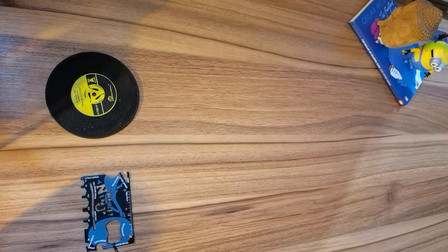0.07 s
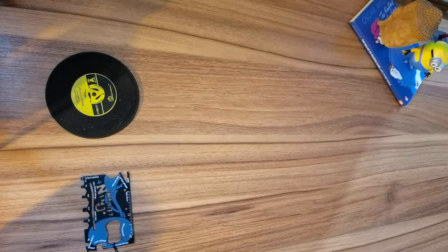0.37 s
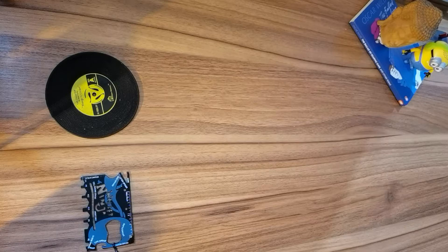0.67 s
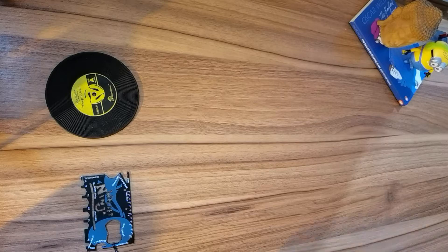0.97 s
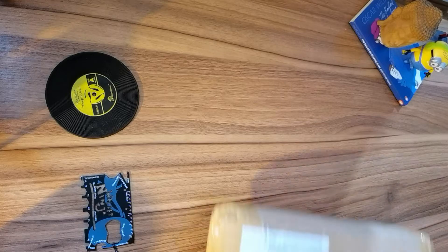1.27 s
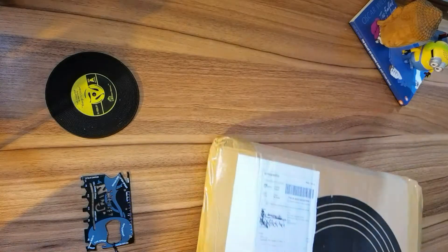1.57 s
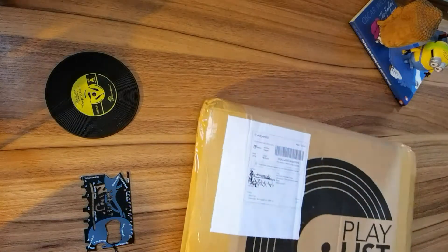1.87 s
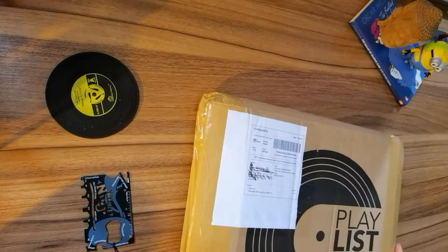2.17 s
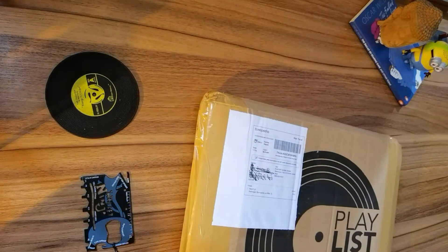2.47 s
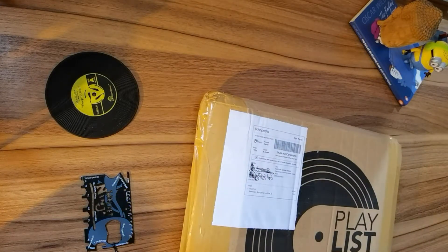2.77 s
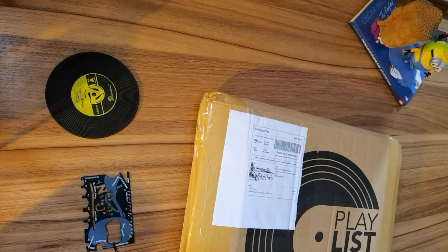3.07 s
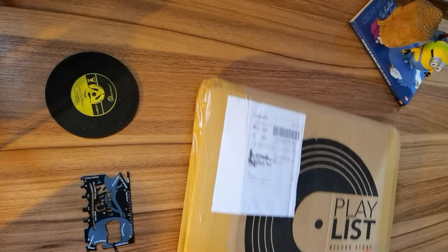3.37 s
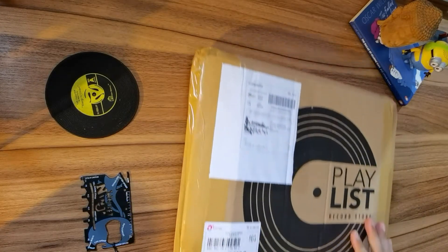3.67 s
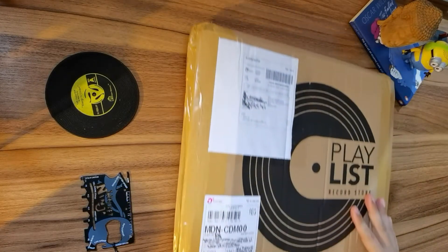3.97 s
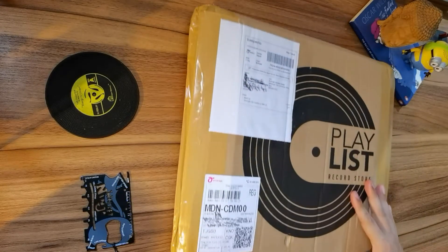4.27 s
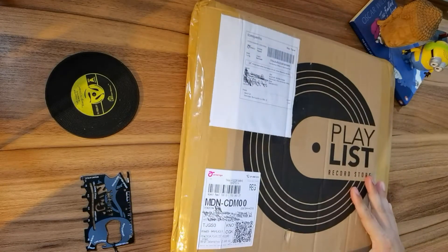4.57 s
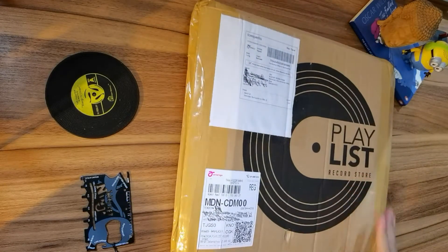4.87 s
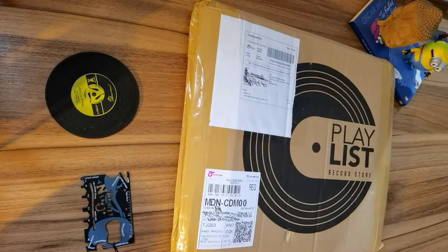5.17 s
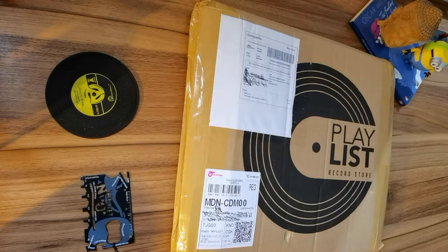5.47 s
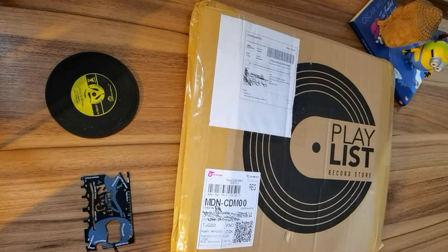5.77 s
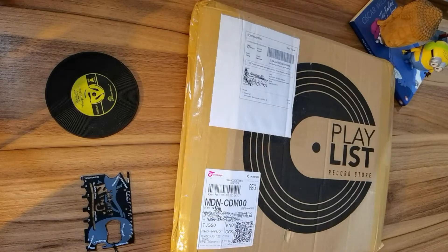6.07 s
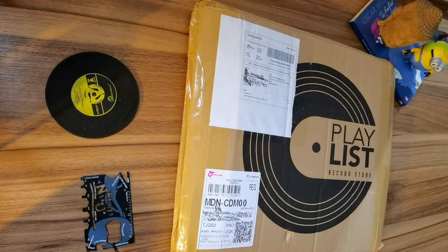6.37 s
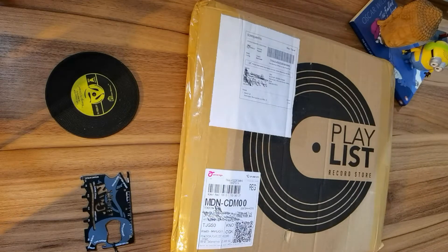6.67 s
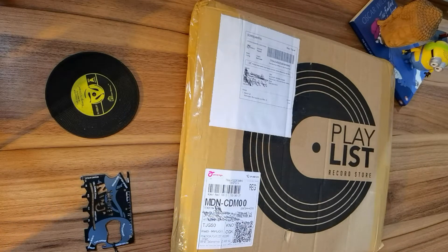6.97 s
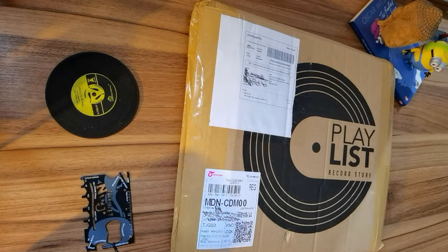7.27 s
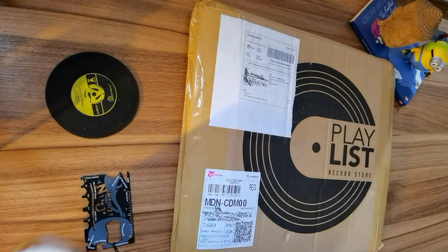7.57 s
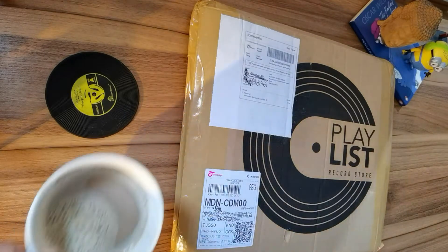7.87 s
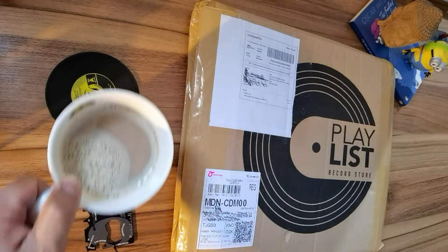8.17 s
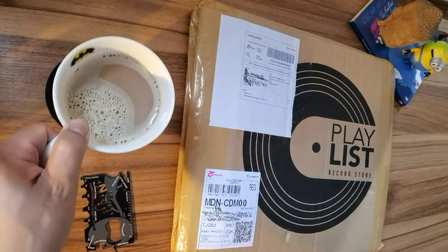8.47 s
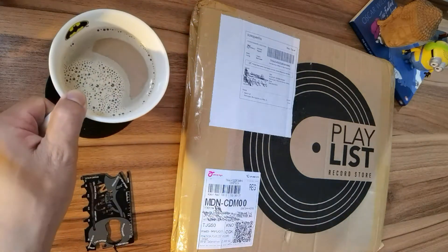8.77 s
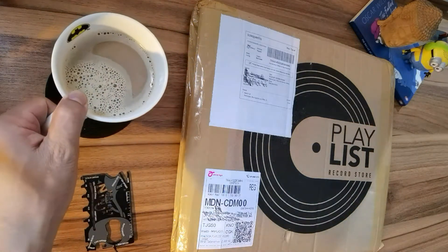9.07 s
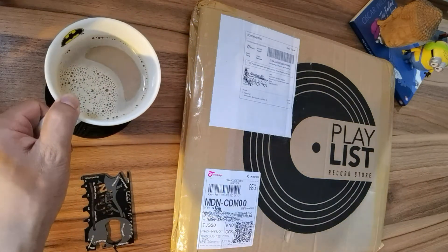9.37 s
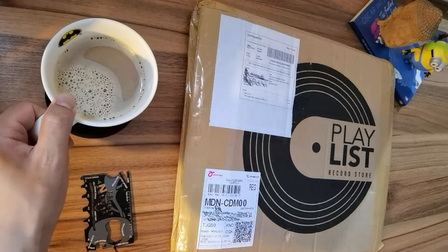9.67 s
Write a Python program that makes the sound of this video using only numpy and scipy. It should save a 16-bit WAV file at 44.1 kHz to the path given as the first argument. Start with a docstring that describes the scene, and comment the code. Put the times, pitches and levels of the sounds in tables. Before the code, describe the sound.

Heard close up in stereo, plastic wrap rustles and snaps around a cardboard parcel as it scrapes onto a wooden table and drops flat with hollow knocks and a thump. One long push hisses across the wood and dies away with a few crinkles. Faint room tone and a low wobbling rumble fill the small room, broken by one brief, faint hoot and finally a mug set down with a dull bump.

```python
"""A small, quiet room, a spaced pair of microphones close to a wooden table. A cardboard parcel in
plastic wrap is picked up, pushed over the table edge, dropped flat and slid along. Tiny friction slips
make the wrap hiss and the carton rasp; creases snap, the carton knocks, the table top thumps and rings.
Later comes one brief low hoot, and near the end a mug is set down softly on a coaster.
Under it all lie faint room tone and a low wobble that comes and goes."""
import sys
import numpy as np
from scipy import signal
from scipy.fft import rfft, irfft, next_fast_len
from scipy.io import wavfile
from scipy.ndimage import uniform_filter1d, map_coordinates

SR = 44100
rng = np.random.default_rng(int(sys.argv[2]) if len(sys.argv) > 2 else 0)


def transcribe(signal):
    """Save signal, clipped to [-1, 1], as a 16-bit WAV file at the path in sys.argv[1]."""
    frames = np.atleast_2d(signal).T
    limited = np.clip(frames, -1, 1)
    pcm = np.round(limited * 32767).astype(np.int16)
    wavfile.write(sys.argv[1], SR, pcm)


N = 433503


def amp(db):
    """Decibels to gain."""
    return 10 ** (np.asarray(db) / 20)


def unit(x):
    """Scales to rms 1."""
    return x / np.sqrt(np.mean(x ** 2) + 1e-20)


def read(points, hz):
    """Reads a table on a log-frequency axis."""
    point_hz, value = np.transpose(points)
    return np.interp(np.log(hz + 1), np.log(point_hz + 1), value)


def add(mix, start_s, sound):
    """Mixes a sound into both channels."""
    part = mix[:, max(round(start_s * SR), 0):][:, :sound.shape[-1]]
    part += sound[..., :part.shape[-1]]


def tint(x, gain):
    """Filters by a gain that is a function of frequency."""
    size = next_fast_len(x.shape[-1] + 2048)
    return irfft(rfft(x, size) * gain(np.fft.rfftfreq(size, 1 / SR)), size)[..., :x.shape[-1]]


def drift(count, per_s):
    """Random wander of rms about 1."""
    knots = rng.standard_normal(8192)
    return map_coordinates(knots, [np.arange(count) * per_s / SR], order=1, mode="wrap")


def envelope(rise_s, hold_s, release_db_per_s, sag_db_per_s=0):
    """Times and gain of one gesture: a smooth rise, a hold that may sag, a release that falls 60 dB."""
    t = np.arange(0, rise_s + hold_s + 60 / release_db_per_s, 1 / SR)
    rise = np.sin(np.pi / 2 * np.minimum(t / rise_s, 1)) ** 2
    held_s = np.maximum(t - rise_s, 0)
    fall_db = sag_db_per_s * np.minimum(held_s, hold_s) + release_db_per_s * np.maximum(held_s - hold_s, 0)
    return t, rise * amp(-fall_db)


def spaced_pair(noises):
    """Two unrelated signals become what two spaced microphones hear: alike in the bass only."""
    # likeness of left and right: frequency_hz, coherence
    likeness = [(60, 0.78), (140, 1), (280, 0.9), (600, 0.62), (1400, 0.17), (3000, 0.082), (7000, 0.012)]
    angle = lambda hz: np.arccos(np.clip(read(likeness, hz), 0, 1)) / 2
    mid = tint(noises[0], lambda hz: np.cos(angle(hz)))
    side = tint(noises[1], lambda hz: np.sin(angle(hz)))
    return np.array([mid + side, mid - side])


def from_left(x, lag_s=.00038):
    """Sound from the left reaches the right microphone later."""
    return np.array([x[0], np.roll(x[1], round(lag_s * SR))])


def room_tone(floor_db=-56.5):
    """Steady room rumble and microphone hiss, with a few narrow hums."""
    # colour of the noise floor: frequency_hz, gain_db
    colour = [(25, -18), (50, 11), (90, 3.5), (140, -5.5), (200, -1.5), (280, -6.5), (450, -12),
              (620, -8.5), (1200, -14.5), (2400, -15.5), (3800, -20.5), (6000, -14), (8400, -13.5),
              (10500, -27), (12000, -37.5), (16000, -44)]
    # faint wavering hums: pitch_hz, width_hz, level_db
    hums = [(138, 21.3, -62.5), (190, 12, -71.5), (621, 7.1, -81)]

    def spectrum(hz):
        peaks = sum(amp(db) * unit(1 / (1 + (2 * (hz - f) / width) ** 2)) for f, width, db in hums)
        return amp(floor_db) * unit(amp(read(colour, hz))) + peaks
    return tint(unit(spaced_pair(rng.standard_normal((2, N)))), spectrum)


def wobble(pitch_hz=52.9, waver_hz=2.42, flutter_db=2.5, rest_db=-60, rock=0.04):
    """One lightly damped low mode swells and fades; a slight rocking moves the microphones oppositely."""
    # swells of the mode: peak_s, half_width_s, level_db
    swells = [(1.6, 0.055, -47), (2.39, 0.23, -40.5), (4.85, 0.3, -42.5), (5.35, 0.2, -52.5),
              (5.74, 0.14, -46), (6.02, 0.068, -48), (6.62, 0.13, -52), (7.94, .04, -47.5),
              (8.16, .11, -42.5), (8.62, .08, -46.5), (9.32, 0.35, -38.5), (9.74, 0.093, -49)]
    t = np.arange(N) / SR
    swell_power = sum(amp(db) ** 2 * np.exp(-2 * ((t - s) / width) ** 2) for s, width, db in swells)
    level = np.sqrt(amp(rest_db) ** 2 + swell_power) * amp(flutter_db * drift(N, 19))
    phase = 2 * np.pi * np.cumsum(pitch_hz + waver_hz * drift(N, 12)) / SR
    return level * unit(np.sin(phase) + rock * np.array([[1], [-1]]) * np.cos(phase))


def rub(strokes, colour, slips_per_s, spread_db, clump_db, wrap_trim_db, carton_trim_db,
        release_db_per_s, sag_db_per_s=0, dull_db_per_s=0, split_hz=1700, ripple_db=2.3, ripple_hz=130):
    """Tiny uneven slips, bunched in clumps, sound the thin wrap (treble) and the carton under it (bass)."""
    out, count = np.zeros((2, N)), SR * 2
    treble = lambda hz: (hz / split_hz) ** 3
    size = amp(spread_db * np.minimum(rng.exponential(1, count), 4.5) + clump_db * drift(count, 160))
    slipping = rng.random(count) < slips_per_s / SR
    # slips happen all over the contact, so each meets the two microphones in its own way
    friction = spaced_pair(size * slipping * rng.choice([-1, 1], (2, count)))
    for start_s, rise_s, hold_s, wrap_db, carton_db in strokes:
        t, effort = envelope(rise_s, hold_s, release_db_per_s, sag_db_per_s)
        slips = np.take(friction, round(start_s * SR) + np.arange(len(t)), axis=1, mode="wrap")
        spot = rng.standard_normal(256)  # each touched spot has small resonances of its own
        ripple = lambda hz: np.interp(hz / ripple_hz, np.arange(len(spot)), spot)
        tone = lambda hz: amp(read(colour, hz) + ripple_db * ripple(hz))
        wrap = unit(tint(slips, lambda hz: tone(hz) * treble(hz) / np.hypot(1, treble(hz))))
        carton = unit(tint(slips, lambda hz: tone(hz) / np.hypot(1, treble(hz))))
        wrap *= amp(wrap_db + wrap_trim_db - dull_db_per_s * t)
        carton *= amp(carton_db + carton_trim_db)
        add(out, start_s, effort * (wrap + carton))
    return out


def hand_grips():
    """Hands take hold of the parcel in short, grainy rubs."""
    # grips: start_s, rise_s, hold_s, wrap_db, carton_db
    strokes = [(.26, 0.029, 0.11, -59, -48), (.393, 0.0086, 0.026, -36, -59),
               (.475, 0.029, 0.013, -51, -42), (.52, 0.025, 0.054, -44, -86), (.735, 0.02, 0.016, -52, -52),
               (.813, 0.0057, 0.0096, -51.5, -74), (.855, 0.02, 0.0092, -52.5, -62),
               (.91, 0.018, 0.023, -52, -55), (1.188, 0.018, 0.019, -58, -77)]
    # colour of hands on the wrap: frequency_hz, gain_db
    colour = [(110, -30), (220, -5.5), (350, -12), (650, -10), (1200, -19), (2400, -8.5), (3800, -8.5),
              (5200, -3.5), (6500, -1.5), (8400, -1.5), (9500, -11), (10700, -7.5), (12000, -19),
              (15800, -22)]
    return rub(strokes, colour, slips_per_s=6000, spread_db=3, clump_db=2.5,
               wrap_trim_db=1.5, carton_trim_db=-4, release_db_per_s=182)


def carton_knocks(scuff=0.99):
    """Card scuffs while the contact lasts and rings the carton's modes near the touched spot's pitch."""
    # hollow knocks: start_s, level_db, centre_hz, spread_octaves, contact_s
    knocks = [(.266, -46.5, 442, 0.27, .008), (.294, -42.5, 446, 0.25, 0.0056),
              (.319, -37, 600, 1.05, 0.0042), (.535, -44, 234, 0.44, 0.014), (.765, -57, 470, .5, 0.037),
              (1.754, -32, 2010, 0.8, 0.0028), (1.834, -35.5, 700, 1.7, 0.0049),
              (1.904, -37, 400, 0.71, 0.0062), (1.962, -39, 1100, 1.8, 0.011), (2.109, -26, 260, 1.5, .004),
              (2.220, -34, 250, .8, .004), (2.292, -36, 700, .9, .005), (2.370, -30, 210, .6, 0.0077),
              (2.403, -34.5, 210, 0.65, 0.0057), (2.874, -48.5, 450, 0.98, 0.021),
              (4.641, -52, 1300, 0.33, 0.023), (4.699, -50.5, 1150, 0.54, 0.017),
              (4.785, -50, 750, 1.8, 0.0078)]
    # modes of the carton: pitch_hz, level_db, t60_s
    modes = [(209, 11, 0.061), (250, -15, 0.016), (327, -11, 0.026), (440, -12.5, 0.093), (552, -7.5, 0.13),
             (632, -8, 0.073), (806, -6, 0.11), (1068, 1, 0.058), (1290, -15, 0.017), (1550, -7.5, 0.05),
             (2020, -2, 0.053)]
    out, t = np.zeros((2, N)), np.arange(SR // 4) / SR
    for start_s, level_db, centre_hz, octaves, contact_s in knocks:
        favour = lambda hz: 1 / (1 + (np.log2((hz + 1) / centre_hz) / octaves) ** 2) ** 1.7
        carton = sum(amp(db - 60 * t / t60) * favour(f) * np.cos(2 * np.pi * f * t) for f, db, t60 in modes)
        contact = (t / contact_s) ** .5 * np.exp(-1.5 * t / contact_s)
        force = spaced_pair(rng.standard_normal((2, len(t)))) * contact
        ring = signal.fftconvolve(force, carton[None], axes=1)[:, :len(t)]
        knock = unit(ring) + scuff * unit(tint(force, favour))
        loudest_rms = np.sqrt(uniform_filter1d((knock ** 2).mean(0), size=400).max())
        add(out, start_s, amp(level_db) * knock / loudest_rms)
    return out


def table_thumps(lead_s=.03):
    """A soft blow pushes the air once and sets the table top ringing."""
    # blows of the parcel, then (last four) of the mug: time_s, push_db, ring_db, centre_hz
    blows = [(0.373, -34, -36, 134), (1.555, -34, -41, 141), (2.041, -44, -35, 170), (2.128, -30, -30, 106),
             (2.158, -37, -28.5, 55), (2.233, -32, -34.5, 79), (2.373, -19, -18, 158),
             (2.394, -11.5, -31, 56.4), (2.475, -31, -27, 138), (2.896, -31, -37, 150),
             (9.307, -26.5, -24, 170), (9.3201, -19, -23, 123), (9.356, -33, -37, 85),
             (9.421, -37, -38, 136)]
    # modes of the table top: pitch_hz, level_db, t60_s
    modes = [(46, -3, 0.38), (79, -22, 0.16), (122, -10.5, 0.13), (139.5, 2.5, 0.35), (184.5, 2, 0.23),
             (215.7, 0, 0.16)]
    out, t = np.zeros((2, N)), np.arange(SR) / SR
    wood = sum(amp(db - 60 * t / t60) * np.sin(2 * np.pi * f * t) for f, db, t60 in modes)
    for time_s, push_db, ring_db, centre_hz in blows:
        offset_squared = (np.pi * centre_hz * (t - lead_s)) ** 2
        push = (2 * offset_squared - 1) * np.exp(-offset_squared)
        ring = signal.fftconvolve(push, wood)[:len(t)]
        add(out, time_s - lead_s, amp(push_db) * push + amp(ring_db) * ring / abs(ring).max())
    return out


def wrap_snaps(crack_s=.0008, flutter_s=0.0063, flutter_db=-14, trim_db=1, ring_db=11, ring_width_hz=550):
    """A crease flips with a sharp crack, then the film flutters briefly; each has its own pitch."""
    # creases snapping over: start_s, peak_db, low_db (gain below 4 kHz), ring_hz
    creases = [(0.405, -23, -10, 5260), (0.412, -20, -12, 5250), (0.42, -17.5, -3, 5170),
               (0.444, -24, -13, 5630), (0.565, -22, -13, 6300), (0.595, -22, -30, 6860),
               (0.821, -32.5, -14, 6400), (0.9253, -33, -13, 6060), (1.197, -40, -18, 7850),
               (1.754, -21, -4, 2130), (1.764, -13.5, -19, 5600), (1.8097, -13, 1, 7340),
               (1.832, -17.5, 6, 5600), (1.884, -12.5, -10, 8700), (1.9553, -15.5, 5, 2840),
               (1.962, -14.5, -12, 2800), (1.97, -14, -2, 7800), (2.0294, -28.5, -14, 8000),
               (2.1256, -18.5, 9, 3980), (2.1602, -20, 1.5, 6870), (2.345, -26, -4, 6500),
               (2.3692, -19.5, 1, 6400), (2.404, -19, 10, 6940), (2.548, -32, -6, 5640),
               (2.916, -33, 1, 10200), (4.634, -32.5, -3, 8100), (4.651, -29.5, -11, 5000),
               (4.786, -35, -9, 3830)]
    # colour of the film's crack: frequency_hz, gain_db
    colour = [(150, -10), (600, -17), (2400, 3.5), (4000, -7), (6000, 2.5), (8400, 5), (10500, -10),
              (12000, -18), (15800, -30)]
    out, t = np.zeros((2, N)), np.arange(2048) / SR
    decay = np.exp(-t / crack_s) + amp(flutter_db) * np.exp(-t / flutter_s)
    for start_s, peak_db, low_db, ring_hz in creases:
        burst = spaced_pair(rng.standard_normal((2, len(t)))) * decay
        shelf = lambda hz: low_db / (1 + (hz / 4000) ** 4)
        resonance = lambda hz: ring_db / (1 + ((hz - ring_hz) / ring_width_hz) ** 2)
        crack = tint(burst, lambda hz: amp(read(colour, hz) + shelf(hz) + resonance(hz)))
        add(out, start_s, amp(peak_db + trim_db) * crack / abs(crack.mean(0)).max())
    return out


def edge_drag():
    """The wrap is drawn over the table edge in a dense, bright hiss."""
    # the drag: start_s, rise_s, hold_s, wrap_db, carton_db
    strokes = [(1.54, 0.022, 0.23, -38.5, -58.5)]
    # colour of wrap on the edge: frequency_hz, gain_db
    colour = [(120, -30), (220, -31), (400, -18), (1200, -21), (2100, -19), (3000, -16.5), (3800, -20),
              (6200, -5), (8300, 2.5), (9300, -2), (10400, -10), (12000, -18), (15800, -21)]
    return rub(strokes, colour, slips_per_s=29000, spread_db=5.5, clump_db=1,
               wrap_trim_db=2.5, carton_trim_db=-4.5, release_db_per_s=250)


def edge_zip(start_s=1.545, level_db=-42, pitch_hz=1985, glide_hz_per_s=600, blur_hz=110):
    """Taut wrap sticks and slips on the edge, ever faster and louder: a fuzzy, rising zip."""
    # harmonics of the slip rate: multiple, level_db
    harmonics = [(1, -6), (3, -6), (4, 6.5), (5, -3)]
    out = np.zeros((2, N))
    t, effort = envelope(rise_s=0.01, hold_s=0.22, release_db_per_s=260, sag_db_per_s=-22)
    turns = np.cumsum(pitch_hz + glide_hz_per_s * t) / SR
    blur = signal.butter(2, blur_hz, fs=SR)
    tone = np.zeros((2, len(t)))
    for multiple, db in harmonics:
        noise = rng.standard_normal((2, SR)) + 1j * rng.standard_normal((2, SR))
        fuzz = signal.lfilter(*blur, noise)[:, :len(t)]
        tone += amp(db) * (fuzz * np.exp(2j * np.pi * multiple * turns)).real
    add(out, start_s, amp(level_db) * effort * unit(tone))
    return out


def table_scrapes():
    """The parcel scrapes onto the table and settles."""
    # scrapes: start_s, rise_s, hold_s, wrap_db, carton_db
    strokes = [(1.68, 0.08, 0.1, -29.5, -47.5), (1.86, 0.036, 0.035, -30.5, -33.5),
               (1.94, 0.015, 0.005, -28, -32.5), (1.97, 0.051, 0.093, -44.5, -42.5),
               (2.105, 0.016, 0.016, -37.5, -43), (2.2, 0.029, 0.17, -65, -40.5),
               (2.325, 0.044, 0.016, -29.5, -35), (2.39, 0.025, 0.018, -38.5, -51)]
    # colour of the parcel scraping wood: frequency_hz, gain_db
    colour = [(100, -21), (200, 6), (400, -7.5), (800, -5), (1400, -6), (2100, -4), (2900, -3), (4000, -5),
              (5800, 2), (8400, 6.5), (9300, -2.5), (10500, -1), (12000, -14), (15800, -12)]
    return rub(strokes, colour, slips_per_s=11000, spread_db=3.5, clump_db=2.5,
               wrap_trim_db=-0.04, carton_trim_db=-8, release_db_per_s=399)


def finger_brushes():
    """Fingers brush the wrap and let go."""
    # light touches: start_s, rise_s, hold_s, wrap_db, carton_db
    strokes = [(2.755, 0.04, 0.013, -42.5, -51.5), (2.82, 0.029, .035, -61, -48),
               (4.626, 0.0089, 0.026, -49, -46), (4.665, 0.017, 0.032, -54, -57)]
    # colour of fingers on the wrap: frequency_hz, gain_db
    colour = [(120, 7), (220, 0.5), (450, -8.5), (1200, -9), (1800, -15), (2900, -5.5), (3900, -13.5),
              (5500, -7.5), (7200, -3), (8600, 3), (10100, 0), (12000, -9.5), (15800, -12)]
    return rub(strokes, colour, slips_per_s=13000, spread_db=1.5, clump_db=2.5,
               wrap_trim_db=2, carton_trim_db=-2, release_db_per_s=400)


def parcel_slide():
    """A small nudge, then one long push that fades and dulls as the parcel slows."""
    # pushes: start_s, rise_s, hold_s, wrap_db, carton_db
    strokes = [(2.98, 0.04, 0.053, -60.5, -65), (3.228, 0.26, 0.985, -33.5, -48)]
    # colour of wrap sliding on wood: frequency_hz, gain_db
    colour = [(100, -35), (190, -9.5), (400, -7), (850, -11), (1600, -10.5), (2300, -8.5), (3100, -7.5),
              (3900, -10.5), (5000, -5.5), (6100, 0), (8400, 0), (9200, -6.5), (10500, -9.5),
              (12000, -18.5), (15800, -22)]
    return rub(strokes, colour, slips_per_s=16000, spread_db=2, clump_db=1.03, wrap_trim_db=4.5,
               carton_trim_db=-0.85, release_db_per_s=300, sag_db_per_s=12.5, dull_db_per_s=5.5)


def hoot(start_s=6.686, level_db=-43.5, pitch_hz=207.8, arch_hz=65.5, arch_s=0.059, octave_db=-32):
    """One short, rough, low tone that arches in pitch."""
    out = np.zeros((2, N))
    t, swell = envelope(rise_s=0.0063, hold_s=0.023, release_db_per_s=347)
    hz = pitch_hz + arch_hz * np.sin(np.pi * np.minimum(t / arch_s, 1))
    phase = 2 * np.pi * np.cumsum(hz) / SR
    tone = unit(np.sin(phase) + amp(octave_db) * np.sin(2 * phase))
    roughness = 1 + 0.43 * drift(len(t), 183)
    add(out, start_s, amp(level_db) * swell * tone * roughness)
    return out


def room(x, wet_db):
    """Direct sound plus the short tail of the room, each band dying at its own speed."""
    # decay of the room: frequency_hz, t60_s
    decay = [(100, 0.44), (1000, 0.2), (6000, 0.28), (15000, 0.23)]
    t = np.arange(SR // 2) / SR
    signs = rng.choice([-1., 1.], (2, len(t)))
    reflections = spaced_pair(signs * (rng.random((2, len(t))) < .1) * (t > .003))
    hz, age_s, bands = signal.stft(reflections, SR, nperseg=256)
    fade = amp(-60 * age_s / read(decay, hz)[:, None])
    tail = signal.istft(bands * fade, SR, nperseg=256)[1][:, :len(t)]
    echo = signal.fftconvolve(x, tail / np.linalg.norm(tail[0]), axes=1)[:, :N]
    return (x + amp(wet_db) * echo) / np.hypot(1, amp(wet_db))


def scene():
    """Handling sounds and room tone, a little left of centre, over the table's thumps and the wobble."""
    # left microphone's lead over the right: frequency_hz, difference_db
    balance = [(100, 1), (300, 0), (600, 3), (2000, 1.5), (8000, 0.9), (14000, 4.5)]
    rubbing = hand_grips() + edge_drag() + table_scrapes() + finger_brushes() + parcel_slide()
    air = room(rubbing + edge_zip(), wet_db=-7)
    air += room(wrap_snaps(), wet_db=-5)
    air += room(carton_knocks(), wet_db=-8.5)
    air += room(hoot(), wet_db=-16)
    air += from_left(room_tone())
    left = tint(air[0], lambda hz: amp(read(balance, hz) / 2))
    right = tint(air[1], lambda hz: amp(-read(balance, hz) / 2))
    bass = room(table_thumps(), wet_db=-8) + wobble()
    return np.array([left, right]) + from_left(bass)


def record(dry, low_cut_hz=30, high_cut_hz=15900, open_s=.13, fade_s=0.012):
    """The microphones open after a moment and shed the deepest bass and the highest treble."""
    lean = tint(dry, lambda hz: 1 / np.hypot(1, (low_cut_hz / (hz + 1)) ** 5))
    opened = lean * np.clip((np.arange(N) / SR - open_s) / fade_s, 0, 1)
    high_cut = signal.firwin(511, high_cut_hz, window=("kaiser", 9), fs=SR)
    return signal.oaconvolve(opened, high_cut[None], "same")


dry = scene()
out = record(dry)
transcribe(out)
```